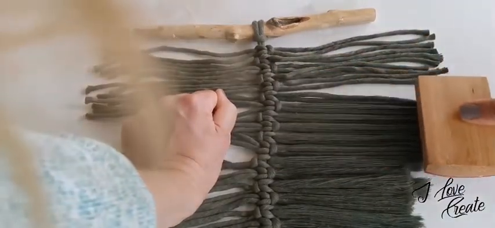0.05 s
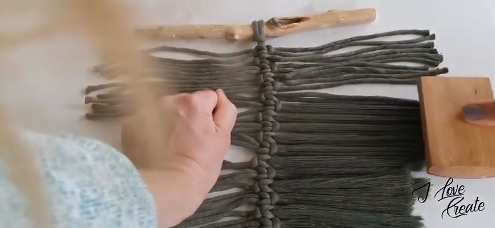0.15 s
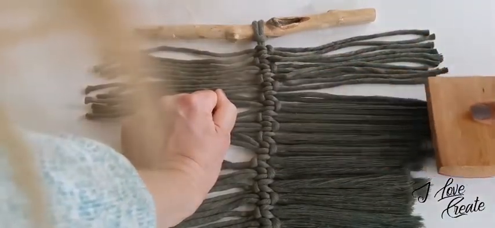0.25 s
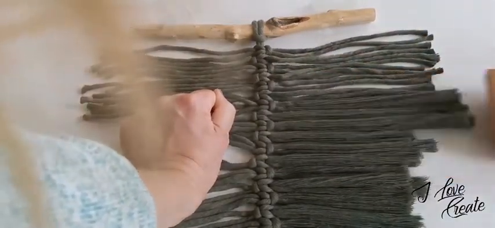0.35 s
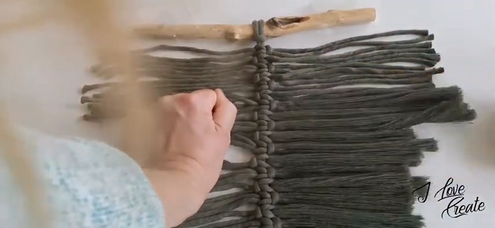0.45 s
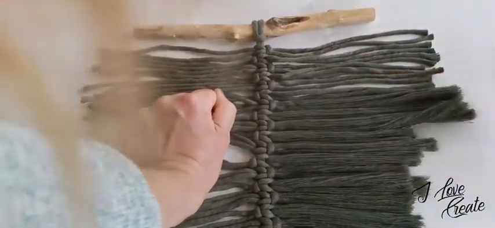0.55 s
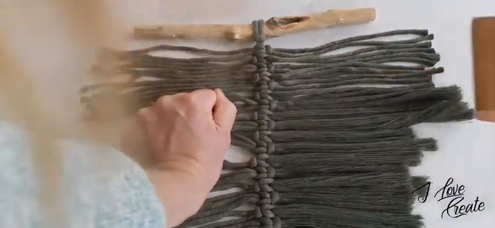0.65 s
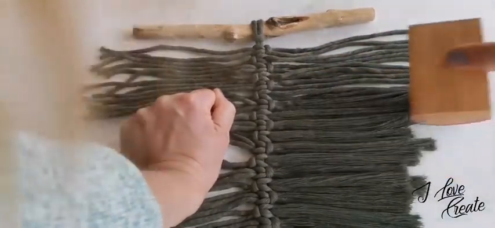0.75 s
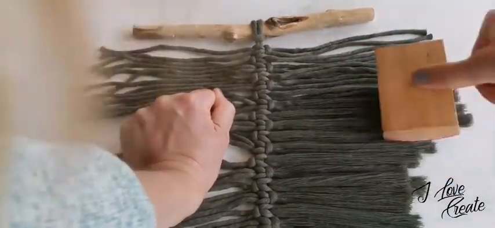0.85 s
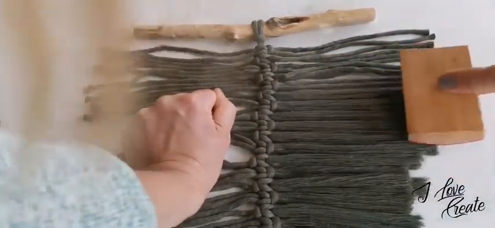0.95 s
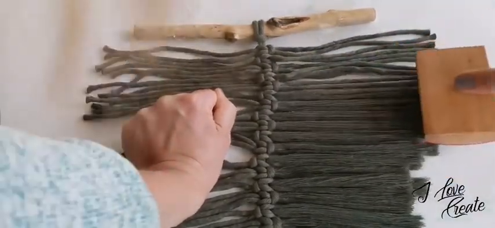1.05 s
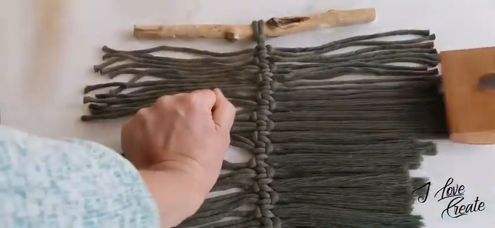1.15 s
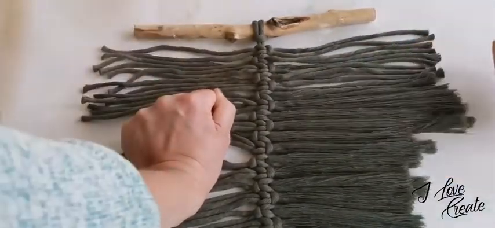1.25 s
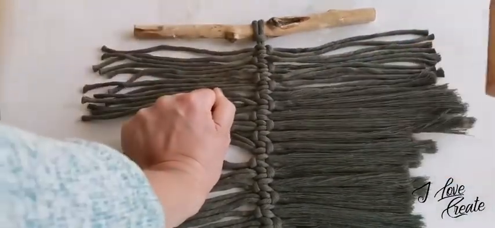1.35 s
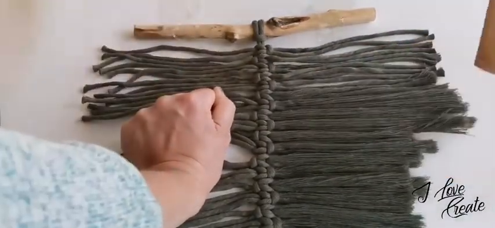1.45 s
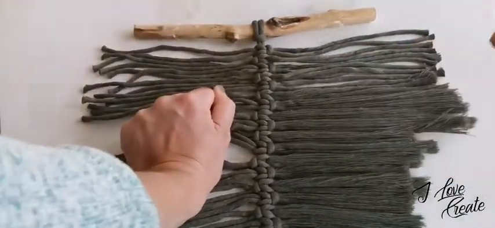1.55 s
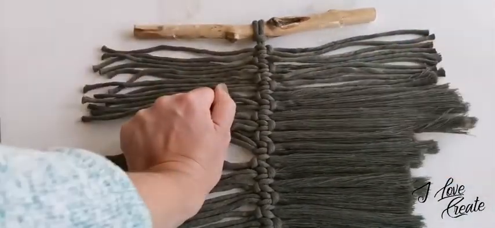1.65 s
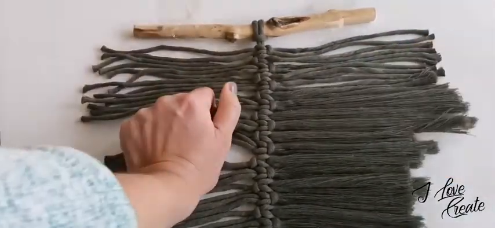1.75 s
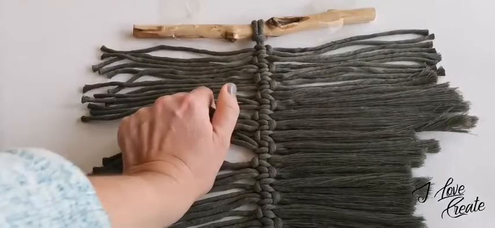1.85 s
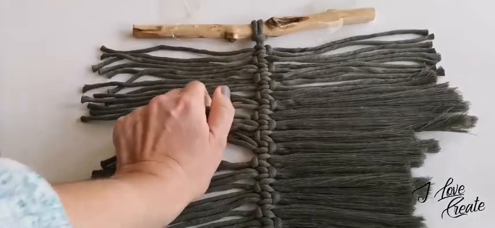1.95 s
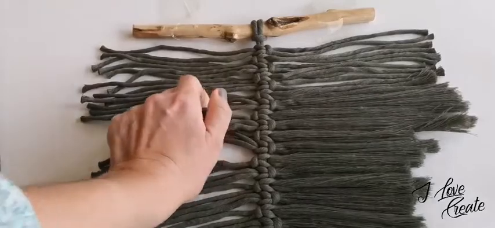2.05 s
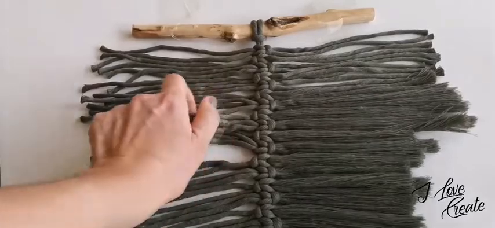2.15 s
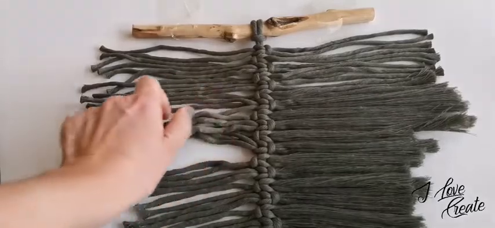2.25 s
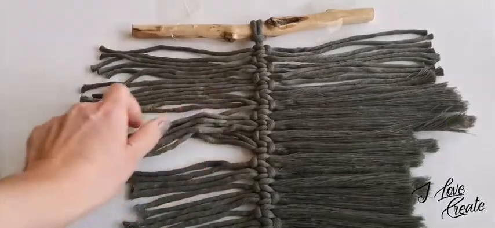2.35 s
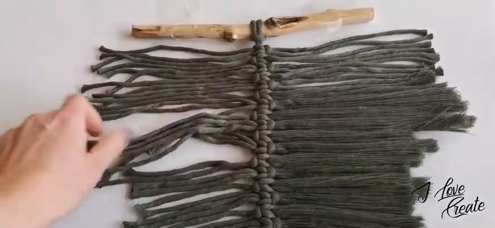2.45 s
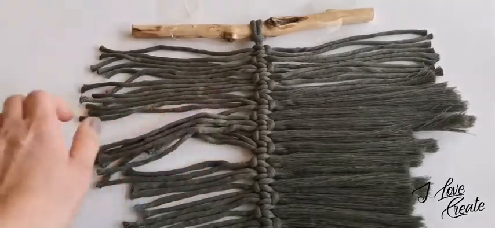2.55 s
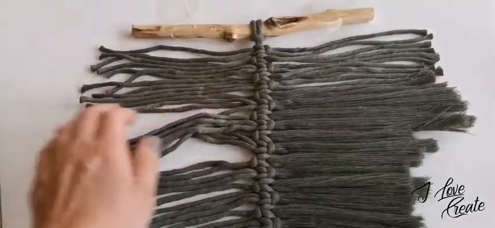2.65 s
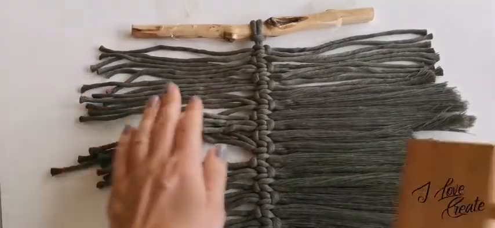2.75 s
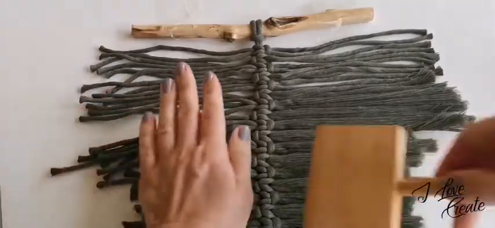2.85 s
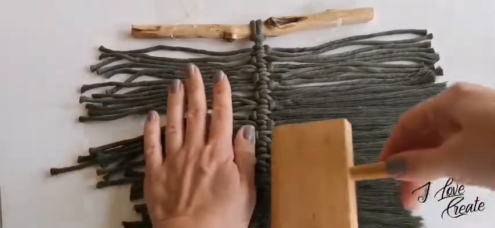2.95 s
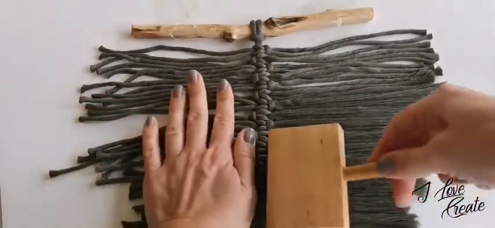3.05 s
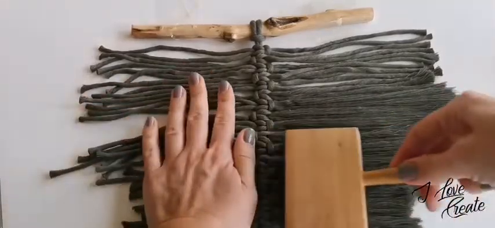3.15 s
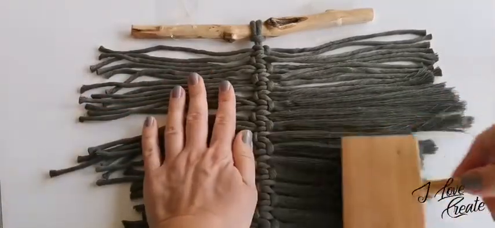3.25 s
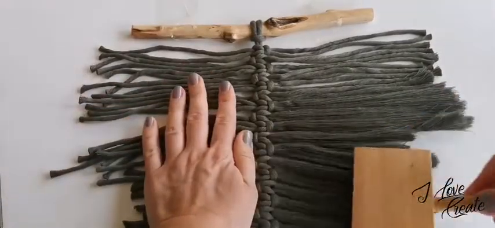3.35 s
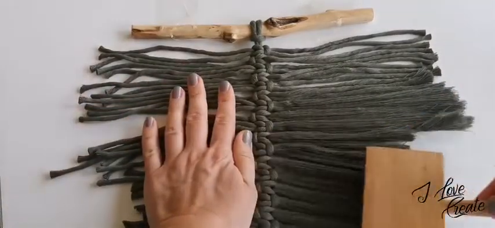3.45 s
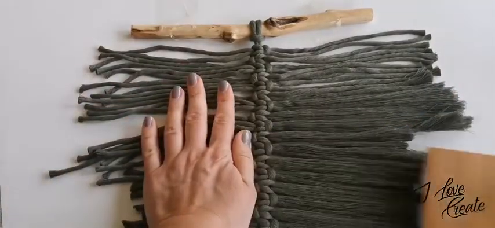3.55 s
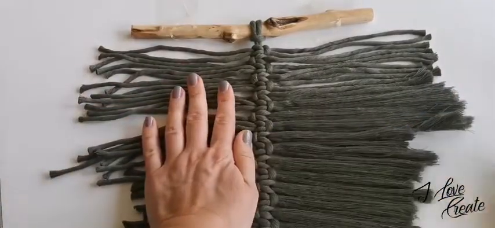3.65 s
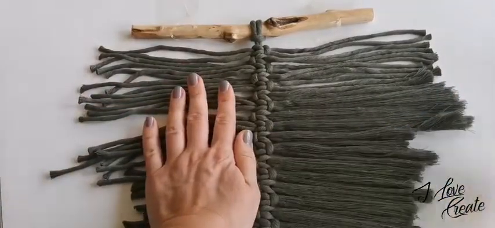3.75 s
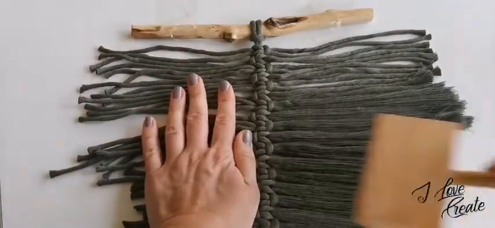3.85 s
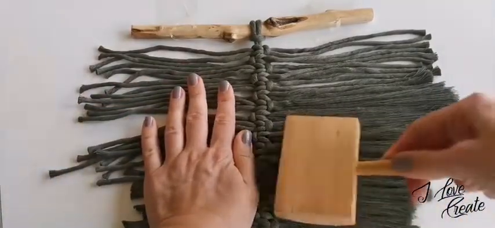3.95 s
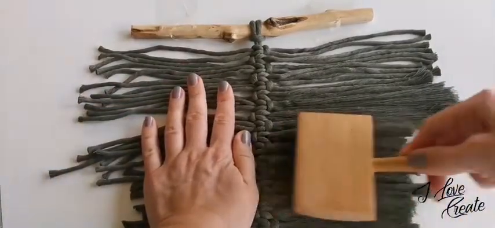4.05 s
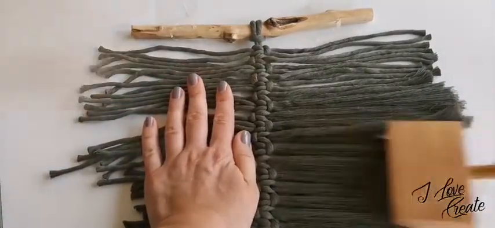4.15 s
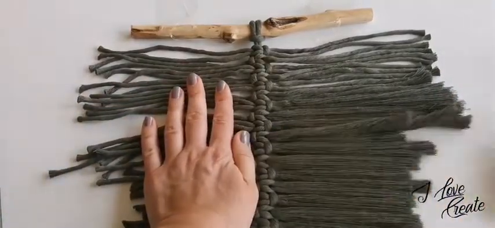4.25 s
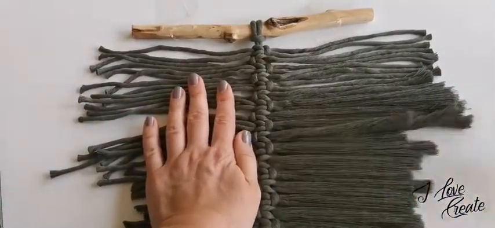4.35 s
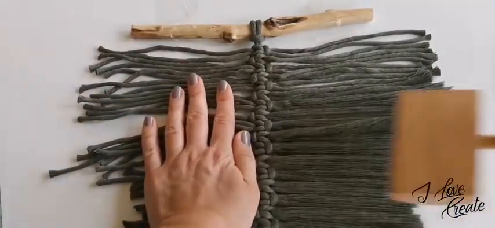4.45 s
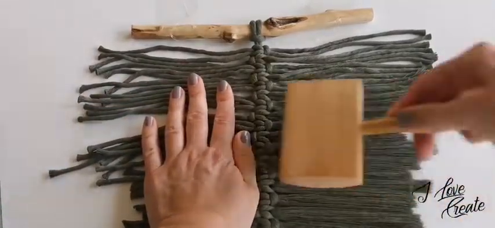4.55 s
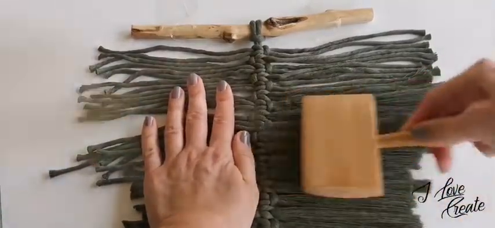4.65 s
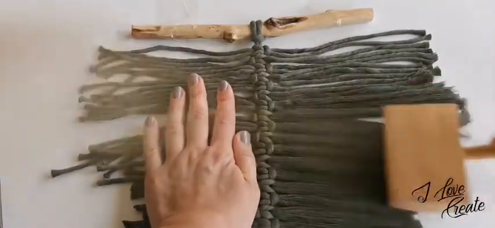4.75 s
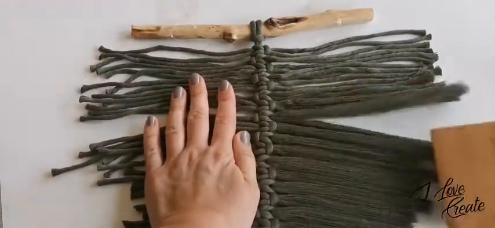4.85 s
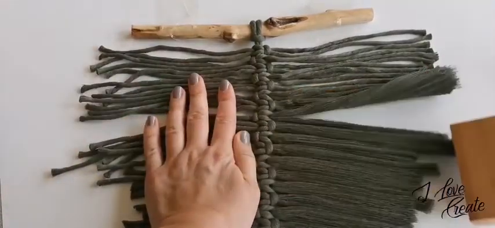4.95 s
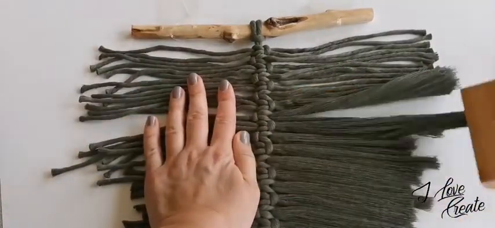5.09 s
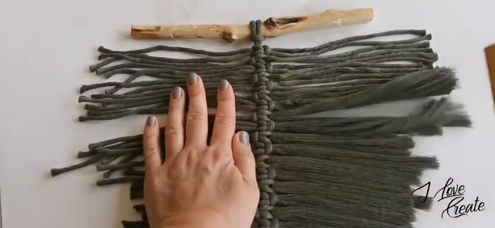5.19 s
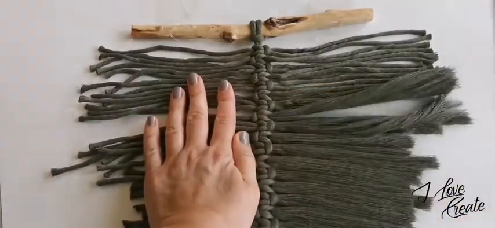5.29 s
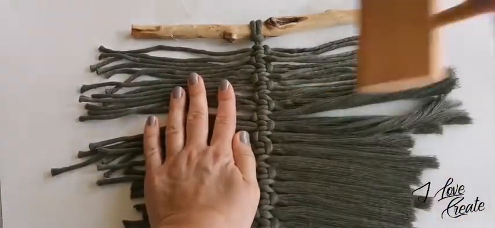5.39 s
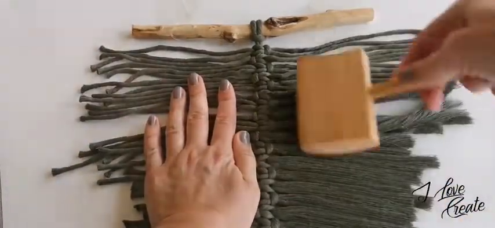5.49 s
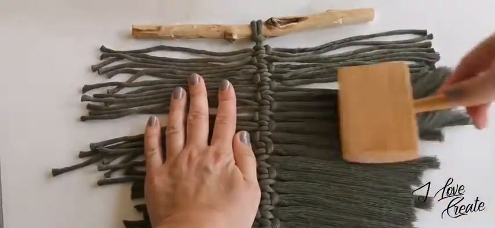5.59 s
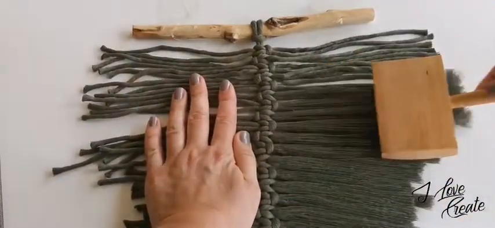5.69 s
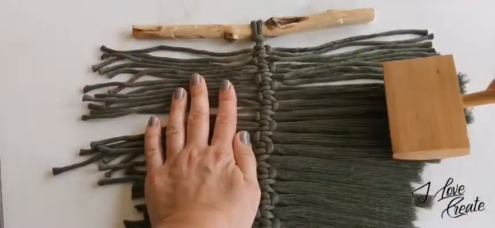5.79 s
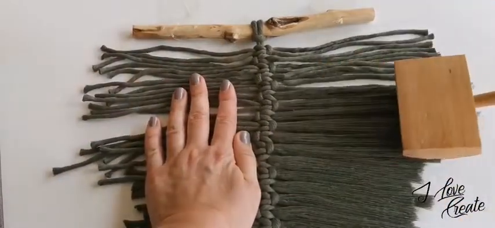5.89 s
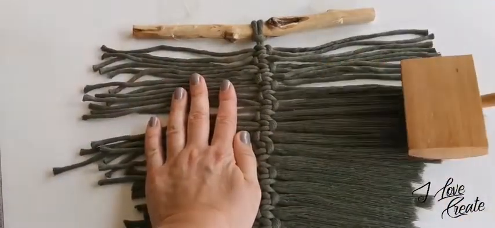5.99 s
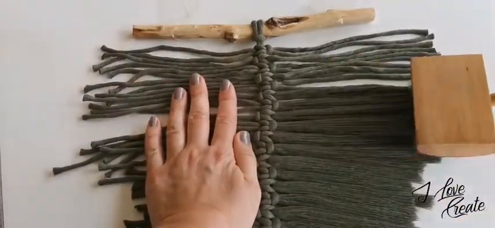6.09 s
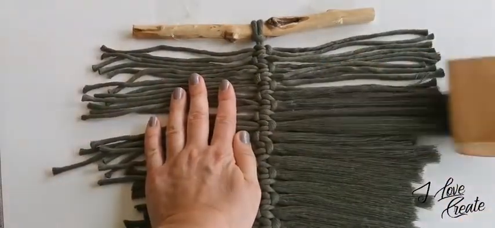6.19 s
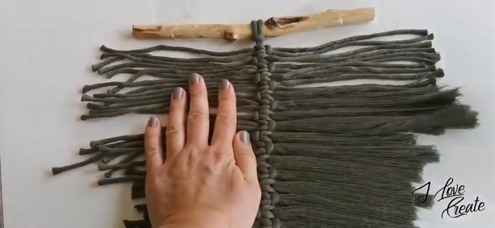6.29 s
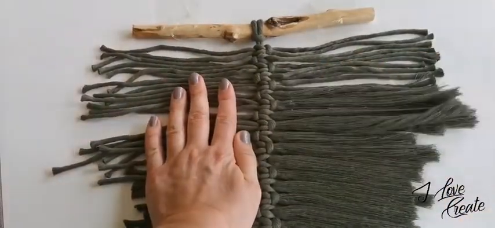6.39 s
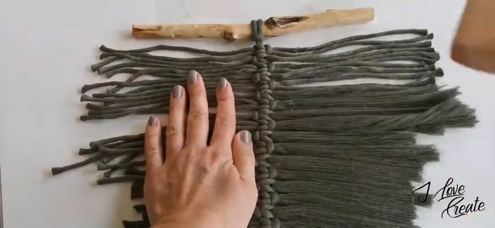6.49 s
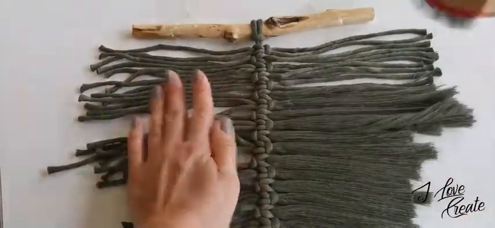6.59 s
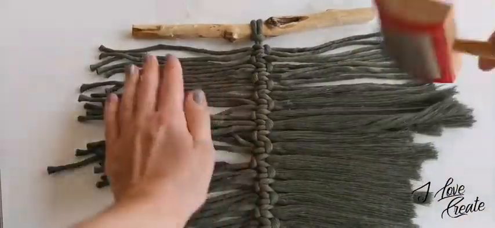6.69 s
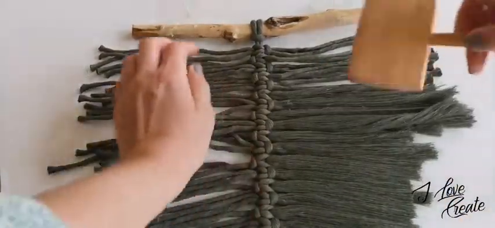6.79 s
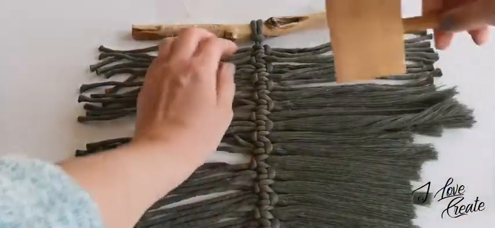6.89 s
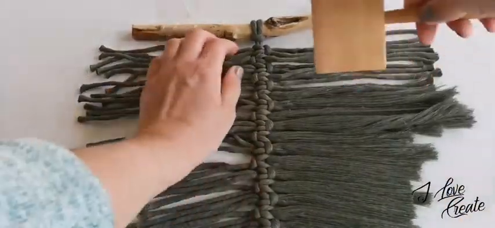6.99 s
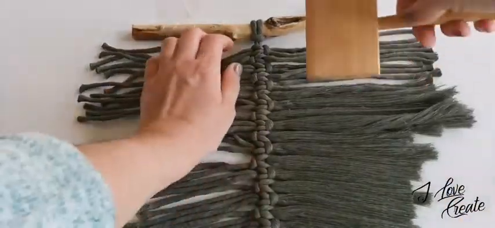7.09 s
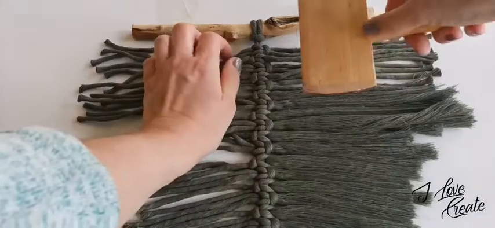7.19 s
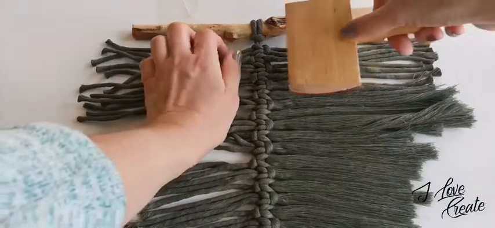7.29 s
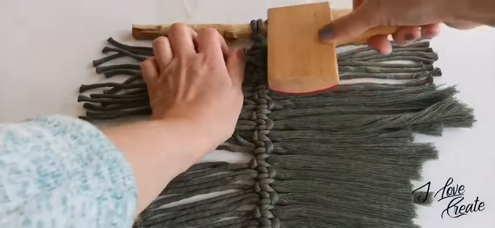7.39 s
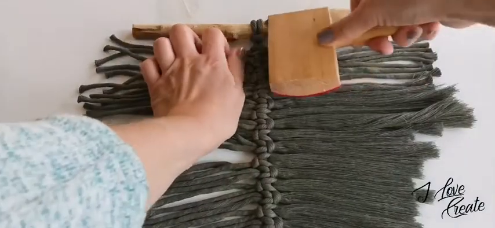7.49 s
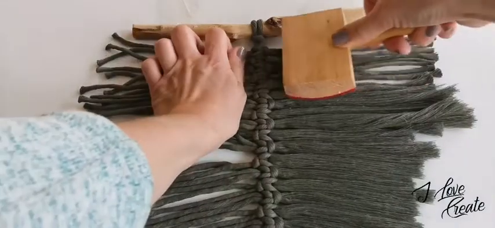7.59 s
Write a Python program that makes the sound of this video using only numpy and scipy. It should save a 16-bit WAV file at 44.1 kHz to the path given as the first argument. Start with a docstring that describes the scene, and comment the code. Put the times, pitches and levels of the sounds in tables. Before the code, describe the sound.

A many-pinned brush scrapes cords on a padded table, close and slightly to the right. Each stroke bites, swells into a bright, fizzy rasp and stops abruptly as the ends come free. Two early groups, a quieter gap, four or five vigorous strokes, then a short one and a crackling release. Between them come small wooden ticks, straining fibres, muffled thuds, hand rubs and a small bird across the bare room, over steady room noise.

```python
"""Fibres creak and pins tick, then a wooden pin brush tears through cord fringe on a table in scratchy strokes.
Strokes, creaks and snaps are coloured trains of random stick-slip impulses; ticks ring modes of the wooden head.
Table bumps and hand taps are noise bursts with damped sines; shuffles are rubbed noise with a hollow resonance.
A small bird peeps across the room in gliding sines. Noise-tail echoes of a small bare room, steady room noise
and a fan's hum lie behind; a gain control thins the lows after loud moments."""
import sys
import numpy as np
from scipy import signal
from scipy.fft import rfft, irfft
from scipy.io import wavfile
from scipy.ndimage import uniform_filter1d

SR = 44100
rng = np.random.default_rng(int(sys.argv[2]) if len(sys.argv) > 2 else 0)


def log_audio(samples):
    """Write samples as a 16-bit WAV file to the path given in sys.argv[1]."""
    # one column per channel
    frames = np.atleast_2d(samples).T
    # limit to full scale, then quantise
    limited = np.clip(frames, -1, 1)
    pcm = np.round(limited * 32767).astype(np.int16)
    wavfile.write(sys.argv[1], SR, pcm)


N = 336483
T = np.arange(N) / SR
HZ = np.fft.rfftfreq(N, 1 / SR)

# Event levels are relative within a layer; layer gains follow in the functions.
# brush surges: (time [s], swell [s], hold [s], fade [dB/s], scrape [dB], first bite re scrape [dB],
#  fizz re scrape [dB], pull on the cords [dB], pin ring [Hz])
STROKES = [ (0.494, 0.084, 0.056, 253, -33.5, -16, 0.5, -41, 2140),
           (1.196, 0.0045, 0.053, 100, -47, -7, -1.5, -45.5, 1930),
           (1.39, 0.031, 0.046, 259, -36, -21, 0.5, -41, 2020),
           (3.406, 0.074, .025, 185, -33, -4.5, -3, -37.5, 2120),
           (3.74, 0.12, 0.073, 328, -31.5, -18, 0, -39, 2350),
           (4.32, 0.016, 0.091, 302, -32.5, 4, -1, -38, 2520),
           (4.413, 0.058, 0.05, 219, -31, -45, 2, -68, 2360),
           (4.927, 0.052, 0.09, 172, -33.5, 2.5, -1, -36.5, 2200),
           (5.123, 0.047, 0.011, 270, -52, -8, 7.5, -51.5, 2000),
           (5.845, 0.036, 0.012, 181, -35, -3.5, -1, -38, 1740), ]
# fibres straining under pins or hand: (time [s], level [dB], length [s])
STRAINS = [(0, -50, 0.023), (0.06, -46.5, 0.058), (0.12, -56.5, 0.38), (0.455, -42, 0.17),
           (1.16, -48.5, 0.049), (1.197, -42.5, 0.11), (1.29, -48, 0.065), (3.28, -58, 0.16),
           (3.36, -48.5, 0.096), (4.88, -49, 0.075), (5.74, -50, 0.31), (6.1, -53, 0.12),
           (6.31, -46.5, 0.12), (6.408, -38, 0.05), (7.2, -61.5, 0.48)]
# a pin slips off a cord and rings the head; the rows at 3.742 s and 6.106 s are the nearest wall's echo of the
# tick just before: (time [s], ring [dB], click re ring [dB])
TICKS = [(0.0607, -30, -2), (0.0715, -17, -11), (0.2536, -23, -12), (0.42, -27, -3), (0.4577, -23.5, -8),
         (1.2735, -13, -11), (1.34, -24, -13), (1.3971, -29, -4), (3.402, -36, -10), (3.574, -15, -26),
         (3.6016, -26, -11), (3.7322, -15.5, -8.5), (3.742, -23, -10), (4.3141, -26, -13),
         (4.3892, -8, -18), (4.3927, -8.5, -15), (5.8476, -22, -4), (6.1001, -27.5, 0.5), (6.106, -36, -1),
         (6.136, -25.5, -5), (6.1916, -35, -2), (6.209, -30, -2), (6.3025, -41.5, 10.5), (6.4126, -28, -10),
         (6.4258, -33, 0)]
# many pins bite or break free at once: (time [s], level [dB], decay [s])
SNAPS = [(1.197, -38, 0.024), (1.283, -29, 0.0041), (1.395, -39, 0.02), (4.921, -39, 0.0055),
         (5.848, -34.5, 0.0079), (6.480, -25, 0.024)]
# brush or hand on the padded table: (time [s], level [dB], decay [s], thud pitch [Hz])
BUMPS = [(1.911, -30.5, 0.0016, 288), (3.435, -39, 0.01, 440), (3.49, -37.5, 0.016, 504),
         (3.749, -38, 0.037, 347), (4.266, -37, 0.031, 91.7), (4.567, -46, 0.051, 361),
         (4.876, -36, 0.037, 88), (5.796, -29.5, 0.039, 122), (5.798, -40.5, 0.028, 280),
         (6.479, -31.5, 0.028, 223)]
# hand holding the cords clicks on the table: (time [s], level [dB], pitch [Hz], crack re ring [dB])
TAPS = [(1.0757, -31.5, 885, -23), (1.7116, -33.5, 620, -1.5), (1.9125, -36.5, 680, 5)]
# soft rubs a little way off: (time [s], level [dB], length [s], hollow note [Hz])
SHUFFLES = [(0.25, -56, 0.027, 488), (1.853, -51.5, 0.042, 517), (2.133, -62.5, 0.59, 487),
            (3.4, -45, 0.11, 500), (3.535, -54, 0.14, 488), (5.637, -59, 0.061, 490),
            (5.78, -50.5, 0.055, 433), (6.678, -47.5, 0.097, 532), (6.81, -62.5, 0.12, 445),
            (7.158, -67, 0.35, 495)]
# bird: (time [s], level [dB], top pitch [Hz], length [s], hoarseness [share of pitch],
#  octave [dB], in-between tones [dB])
PEEPS = [(2.191, -55, 2166, 0.077, 0.0156, -11, -31), (5.55, -48.5, 2349, 0.082, 0.024, -11, -13.5),
         (6.838, -46, 2412, 0.043, 0.014, -19, -40)]

# source spectra, relative: (frequency [Hz], density [dB/Hz])
SCRAPE_SPECTRUM = [(500, -31), (1000, -33.5), (1500, -8), (2000, -1.5), (2600, -2), (3400, 0), (4150, -3),
                   (4900, -2), (5800, -18.5), (7000, -56.5), (10000, -55.5)]
FIZZ_SPECTRUM = [(3000, -34.5), (5500, 1.5), (7000, 0), (8200, 0), (9200, 0), (10300, -3.5), (11500, -3.5),
                 (13000, -12.5)]
RASP_SPECTRUM = [(400, -70), (700, -9), (1100, 6), (1400, 5), (2000, -13), (4000, -114)]
DRAG_SPECTRUM = [(40, -21), (150, -7), (300, 3.5), (470, 8), (650, -5), (1200, -39), (4000, -72)]
STRAIN_SPECTRUM = [(100, -21), (650, -7), (1080, 7.5), (1500, 4.5), (2050, 2.5), (2650, -2), (3300, 0.5),
                   (4600, -2), (5400, -6), (6300, -8.5), (7300, -6), (9200, -14.5), (13000, -31)]
TICK_SPECTRUM = [(400, -38), (1000, 5.5), (2700, 2), (4600, 3), (5400, -5.5), (6200, -1.5), (7300, -7),
                 (9200, -13.5), (13000, -38)]
SNAP_SPECTRUM = [(100, -48), (650, -42), (1100, 1.5), (1900, 2.5), (3300, 1.5), (5200, 5), (7000, -1),
                 (8200, -2.5), (10300, -2.5), (13000, -11)]
SHUFFLE_SPECTRUM = [(100, -23.5), (240, -4), (340, -20.5), (440, 0), (530, -5.5), (700, -14.5),
                    (1100, -15.5), (1800, -22.5), (3000, -32), (8000, -39.5), (13000, -59)]
FLOOR_SPECTRUM = [(12, -39), (20, 13), (64, -2.5), (96, -6.5), (145, -0.5), (175, -4), (270, -7.5),
                  (405, -10), (464, -8), (625, -13.5), (1490, -20.5), (4900, -26.5), (6090, -32.5),
                  (7980, -28.5), (13000, -38.5)]
# thud spectrum: (frequency [multiple of thud pitch], density [dB/Hz])
BUMP_SPECTRUM = [(.2, -21), (.5, -2), (1, 3.5), (1.7, 0.5), (2.6, -7), (4, -12), (6, -16), (13, -15),
                 (35, -41.5), (100, -47)]
# modes of the wooden head: (frequency [Hz], level [dB], t60 [s])
HEAD_MODES = [(1274, -14, 0.013), (2036, -1, 0.0046), (3360, -19, 0.012)]
# left-right likeness of diffuse noise: (frequency [Hz], correlation [-1..1])
LIKENESS = [(30, 0.73), (400, 0.62), (900, 0.19), (2000, 0), (13000, 0.18)]
# left-right channel balance, scaled per source: (frequency [Hz], left re right [dB])
CHANNEL_BALANCE = [(100, -6), (650, 3), (1100, -3.5), (1600, 1), (2400, -4), (3300, -3.5), (4800, -5),
                   (6000, -8.5), (7000, -16), (8000, -23.5), (9200, 7.5), (10300, 15), (13000, 14)]
# reverberation: (frequency [Hz], t60 [s])
ROOM_T60 = [(150, 0.64), (600, 0.72), (2000, 0.5), (5000, 0.46), (12000, 0.41)]

TOUCH_DB, TOUCH_S = 2.5, 0.0055  # pins graze the cords just before they bite
DULL_DB, SPEED_UP_S = -10.5, 0.03  # a stroke starts dull, brightens as the brush gathers speed
SLACK_DB_PER_S2 = 283  # cords go slack ever faster as pins near their loose ends
RASP_FOLLOWS = 0.12  # share of the swell, in dB, passed to the cord tension
EARLY_ECHO_DB = 1  # echo gain before the first wall answers
WALL_BOOST, WALL_S = 0.92, 0.0064  # first wall echoes stand out of the tail
FLOOR_DB, HUM_DB, HUM_HZ = -57, -65.5, 146  # room noise; distant fan
EDGE_HZ = 13120  # upper band limit


def strokes(judder_db=0.24):
    """Hundreds of pins tear through fibres; taut cords rasp and pass the drag on to the table."""
    scrape, fizz, tension = sum(pull(*row[:-1]) for row in STROKES)
    # rows of pins catch together
    judder = amp(judder_db * unit(uniform_filter1d(rng.standard_normal(N), size=300)))
    snags = spray(per_s=900, spread_db=2.5, shared=0.7)
    fine_slips = spray(per_s=5000, spread_db=1, shared=0.25)
    fibres = judder * unit(patchy_bands(fine_slips) + 0.65 * snags)
    hiss = amp(3.0) * colour(fibres * scrape, SCRAPE_SPECTRUM)
    hiss += amp(-0.5) * colour(fibres * fizz, FIZZ_SPECTRUM)
    rasp = amp(-3.5) * colour(snags * tension, RASP_SPECTRUM)
    slides = slips(per_s=600, spread_db=1.5)
    drag = amp(-11.5) * colour(slides * tension, DRAG_SPECTRUM)
    return hiss + amp(-4.5) * scrape * pin_ring() + rasp + drag


def pull(s, swell, hold, fade, db, bite_db, bright_db, taut_db):
    """Scrape, fizz and cord-tension envelopes of one stroke: it bites, swells, holds and runs out."""
    age = np.maximum(T - s, 0)
    touch = np.where(T < s, amp(TOUCH_DB) * np.exp(np.minimum(T - s, 0) / TOUCH_S), 1)
    contact = touch * amp(-fade * np.maximum(age - swell - hold, 0))
    swell_db = bite_db * (1 - np.sin(np.pi / 2 * np.minimum(age / swell, 1)))
    scrape = contact * amp(db + swell_db)
    fizz = scrape * amp(bright_db + DULL_DB * np.exp(-age / SPEED_UP_S))
    tension = contact * amp(taut_db + RASP_FOLLOWS * swell_db - SLACK_DB_PER_S2 * age ** 2)
    return np.array([scrape, fizz, tension])


def patchy_bands(x):
    """Random narrow patches of the scrape swell and fade for some tens of milliseconds."""
    z = signal.stft(x, nperseg=512)[2]
    patches = uniform_filter1d(rng.standard_normal(z.shape[1:]), size=7, axis=1)  # over time
    patches = unit(uniform_filter1d(patches, size=5, axis=0))  # over frequency
    gain = amp(5.8 * np.minimum(patches, 1.1))
    return unit(signal.istft(z * gain)[1][:, :N])


def pin_ring(width_hz=520, rise_hz_per_s=1300):
    """The pins ring in one broad band that climbs as they shed their load of cord."""
    starts, hz = np.array([(row[0], row[-1]) for row in STROKES]).T
    row = latest(starts)
    climb_hz = rise_hz_per_s * np.clip(T - starts[row], 0, 0.5)
    return resonate(spray(per_s=2500, spread_db=4.5, shared=1.0), hz[row] + climb_hz, width_hz)


def snaps():
    """A row of pins lets go in one crackling burst of slips."""
    crackle = spray(per_s=12000, spread_db=1, shared=0.7)
    return colour(bursts(SNAPS, rise_s=0.0007) * crackle, SNAP_SPECTRUM)


def strains():
    """Fibres under slow strain crackle faintly in dense small slips."""
    crackle = slips(per_s=3500, spread_db=3.8)
    return amp(-4.5) * colour(swells(STRAINS) * crackle, STRAIN_SPECTRUM)


def ticks(click_db=9, chatter_db=2.5, decay_s=0.0007, rise_s=0.0001725):
    """Single pins flick against the head: a chattering click beside the head's briefly ringing modes."""
    out = np.zeros(N)
    t = np.arange(4096) / SR
    modes = sum(amp(db - 60 * t / t60) * np.sin(2 * np.pi * hz * t) for hz, db, t60 in HEAD_MODES)
    ring = (1 - np.exp(-t / rise_s)) * modes
    for s, db, bright_db in TICKS:
        chatter = unit(t * np.exp(-t / decay_s) * rng.choice([-1., 1.], len(t))) / np.sqrt(len(t))
        flick = amp(chatter_db) * chatter
        flick[round(decay_s * SR)] = 0.42  # one main impulse at the peak of the chatter
        add(out, s, amp(db) * ring)
        add(out, s, amp(db + bright_db + click_db) * colour(flick, TICK_SPECTRUM))
    return out


def bumps(ring_db=-4):
    """Dull thuds of the table under the cords: noise scaled to the thud's pitch, plus a damped sine."""
    out = np.zeros(N)
    for s, db, decay_s, hz in BUMPS:
        blow = bursts([(s, db, decay_s)], rise_s=0.00025)
        spectrum = [(k * hz, level) for k, level in BUMP_SPECTRUM]
        out += amp(-5.0) * colour(blow * rng.standard_normal(N), spectrum)
        out += amp(ring_db) * blow * np.sin(2 * np.pi * hz * (T - s))
    return out


def taps(decay_s=0.0014, crack_s=0.00067, right_db=-15):
    """A short damped ring under a dry noise crack, heard mostly on the left."""
    cracks = [(s, db + crack_db, crack_s) for s, db, hz, crack_db in TAPS]
    out = bursts(cracks, rise_s=1 / SR) * rng.standard_normal(N)
    for s, db, hz, _ in TAPS:
        out += bursts([(s, db, decay_s)], rise_s=decay_s / 10) * np.sin(2 * np.pi * hz * (T - s))
    return out * amp([[0], [right_db]])


def shuffles(hollow_db=-6, width_hz=110):
    """Soft rubs swell and fade as sparse slips, each with resonant noise at its own hollow note."""
    starts, hz = np.array([(row[0], row[-1]) for row in SHUFFLES]).T
    level = swells([row[:-1] for row in SHUFFLES])
    hollow = resonate(rng.standard_normal(N), hz[latest(starts)], width_hz)
    rub = colour(level * slips(per_s=1100, spread_db=6.5), SHUFFLE_SPECTRUM)
    return rub + amp(hollow_db) * level * hollow


def bird(scoop=0.04, flutter=0.48, rise=0.18):
    """Each peep flicks up to a wavering pitch and flutters, with an octave and growing tones in between."""
    out = np.zeros(N)
    for s, db, hz, length_s, rough, octave_db, between_db in PEEPS:
        u = np.clip((T - s) / length_s, 0, 1)
        noise = uniform_filter1d(rng.standard_normal((2, N)), size=100)
        waver, shake = map(unit, uniform_filter1d(noise, size=60))
        pitch_hz = hz * (1 - scoop * (1 - u) ** 4 + rough * waver)
        turn = 2 * np.pi * np.cumsum(pitch_hz) / SR
        between = np.sin(turn * 3 / 4) + np.sin(turn * 3 / 2) / 4
        voice = np.sin(turn) + amp(octave_db) * np.sin(2 * turn)
        voice += amp(between_db) * np.minimum(2 * u, 1) * between
        envelope = np.minimum(np.minimum(u, 1 - u) / rise, 1)
        out += amp(db) * envelope * (1 + flutter * shake) * voice
    return out


def room(x, first_wall_s=0.01, count=3):
    """Bare-wall echoes: noise tails, each band dying at its own speed, weighted in turn so the paths shift."""
    out = np.zeros((2, N))
    for k in range(count):
        hz, t, z = signal.stft(pair(*rng.standard_normal((2, SR // 2))), SR, nperseg=256)
        tail = signal.istft(z * amp(-60 * t / read(ROOM_T60, hz)[:, None]), SR)[1]
        since = np.arange(tail.shape[1]) / SR - first_wall_s
        wall = 1 + WALL_BOOST * np.exp(-abs(since) / WALL_S)
        tail = tail * np.where(since < 0, amp(EARLY_ECHO_DB), wall)
        place = np.sqrt(2 / count) * np.cos(np.pi * (2 * T + k / count))
        sent = np.ones((2, 1)) * x * place
        out += signal.oaconvolve(sent, tail / np.linalg.norm(tail[0]), axes=1)[:, :N]
    return out


def room_tone():
    """Steady coloured room noise with a fan's drone, a narrow noise band that wavers."""
    air = pair(*[colour(rng.standard_normal(N), FLOOR_SPECTRUM) for _ in range(2)])
    hum = unit(irfft(rfft(rng.standard_normal(N)) / (1 + ((HZ - HUM_HZ) / 2.5) ** 2), N))
    return amp(FLOOR_DB) * air + amp(HUM_DB) * hum


def slips(per_s, spread_db):
    """A random train of tiny stick-slip releases, a few much larger than the rest."""
    size = amp(spread_db * np.minimum(rng.exponential(1, N), 3))
    return unit(size * rng.choice([-1., 1.], N) * (rng.random(N) < per_s / SR))


def spray(per_s, spread_db, shared):
    """Slips all over the brush head: only a share of their power reaches both microphones alike."""
    left, right, both = (slips(per_s, spread_db) for _ in range(3))
    common = np.sqrt(shared) * from_right(both, lag_s=0.00012)
    return common + np.sqrt(1 - shared) * np.array([left, right])


def from_right(x, lag_s=0.00014):
    """The brush works to the right, so the left microphone hears it a little later."""
    return np.array([irfft(rfft(x) * np.exp(-2j * np.pi * HZ * lag_s), N), x])


def pair(a, b):
    """Two unrelated noises become a microphone pair that shares its bass."""
    same = np.clip(read(LIKENESS, np.fft.rfftfreq(len(a), 1 / SR)), -1, 1)
    return np.array([a, irfft(same * rfft(a) + np.sqrt(1 - same ** 2) * rfft(b), len(a))])


def channel_balance(x, share):
    """The left and right channels favour different bands."""
    half = np.array([[0.5], [-0.5]])
    return irfft(rfft(x) * amp(share * read(CHANNEL_BALANCE, HZ) * half), N)


def bursts(rows, rise_s):
    """Envelope of blows that rise fast and die away exponentially."""
    envelope = np.zeros(N)
    for s, db, decay_s in rows:
        age = np.maximum(T - s, 0)
        envelope += amp(db) * (1 - np.exp(-age / rise_s)) * np.exp(-age / decay_s)
    return envelope


def swells(rows):
    """Envelope of rubs that swell and fade in one arch each."""
    envelope = np.zeros(N)
    for s, db, length_s in rows:
        u = np.clip((T - s) / length_s, 0, 1)
        envelope += amp(db) * np.sqrt(abs(np.sin(np.pi * u)))
    return envelope


def resonate(x, hz, width_hz):
    """A unit-rms resonance that follows the pitch curve hz: shift down, low-pass, shift back."""
    turn = np.exp(2j * np.pi * np.cumsum(hz) / SR)
    r = np.exp(-np.pi * width_hz / SR)
    low = signal.lfilter([(1 - r) ** 2], [1, -2 * r, r * r], x / turn)
    return unit((turn * low).real)


def colour(x, spectrum):
    """Causal minimum-phase filter of unit energy with the given spectrum."""
    log_gain = np.log(amp(read(spectrum, abs(np.fft.fftfreq(4096, 1 / SR)))))
    ring = np.fft.ifft(np.exp(np.conj(signal.hilbert(log_gain)))).real[:len(log_gain) // 2]
    return np.apply_along_axis(signal.oaconvolve, -1, x, ring / np.linalg.norm(ring))[..., :N]


def read(points, hz):
    """Reads a table on a log-frequency axis."""
    f, value = np.transpose(points)
    return np.interp(np.log(hz + 1), np.log(f + 1), value)


def latest(starts):
    """For every moment, the row that began last."""
    return np.maximum(np.searchsorted(starts, T, "right") - 1, 0)


def add(mix, s, sound):
    """Mixes a sound in at its time."""
    part = mix[round(s * SR):][:len(sound)]
    part += sound[:len(part)]


def amp(db):
    """Decibels to gain."""
    return 10 ** (np.asarray(db) / 20)


def unit(x):
    """Scales to an rms of one."""
    return x / np.sqrt(np.mean(x ** 2) + 1e-20)


def scene():
    """Close brushing, far small sounds and the room that joins them."""
    brush = strokes() + snaps()
    tick = from_right(strains() + ticks())
    thud, tap = bumps(), taps()
    shuffle, peep = shuffles(), bird()
    close = channel_balance(brush, share=0.73) + channel_balance(tick, share=1.0) + thud + tap
    sent = amp(-7.0) * brush + amp(-4.0) * tick + amp(-8.5) * (thud + tap.mean(0))
    echo = channel_balance(room(sent), share=0.78)
    far_shuffle = amp(-2.0) * shuffle + amp(-0.5) * room(shuffle)
    far_bird = (amp(-0.5) * peep + amp(0.4) * room(peep)) * amp([[2.5], [-3]])  # leans left
    return close + echo + far_shuffle + far_bird + room_tone()


def record(dry, threshold_db=-44, cut_db_per_db=0.24, recover_db_per_s=42, bass_hz=650):
    """Gain control turns the lows down at loud moments and lets them back slowly; then the band limit."""
    power = abs(uniform_filter1d((dry ** 2).mean(0), SR // 50))
    power_db = 10 * np.log10(power + 1e-12)
    fall_db = T * recover_db_per_s
    held_db = np.maximum.accumulate(power_db + fall_db) - fall_db  # peak hold, steady release
    over_db = np.maximum(held_db - threshold_db, 0)
    lows = irfft(rfft(dry) / (1 + (HZ / bass_hz) ** 4), N)
    ducked = dry + lows * (amp(-cut_db_per_db * over_db) - 1)
    band = signal.firwin(511, EDGE_HZ, window=("kaiser", 9), fs=SR)
    return signal.oaconvolve(ducked, band[None], "same")


dry = scene()
out = record(dry)
log_audio(out)
```